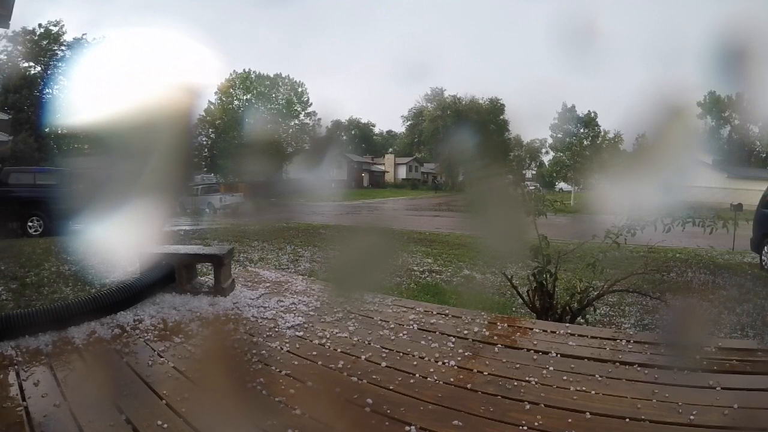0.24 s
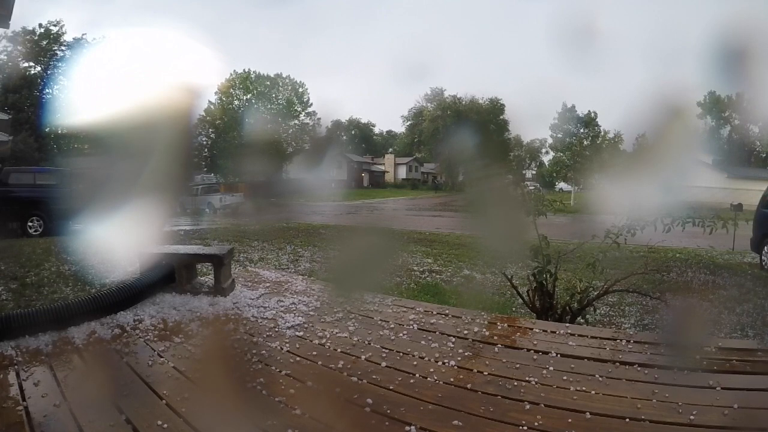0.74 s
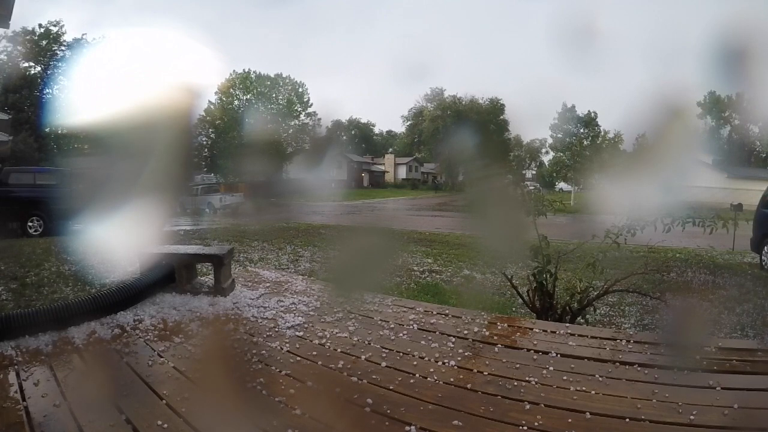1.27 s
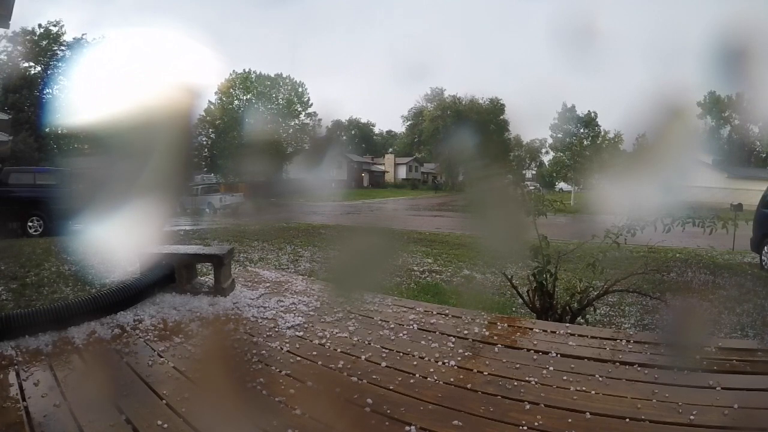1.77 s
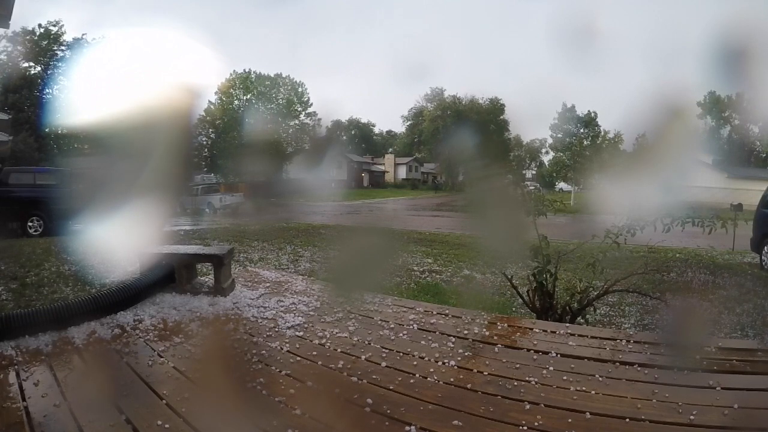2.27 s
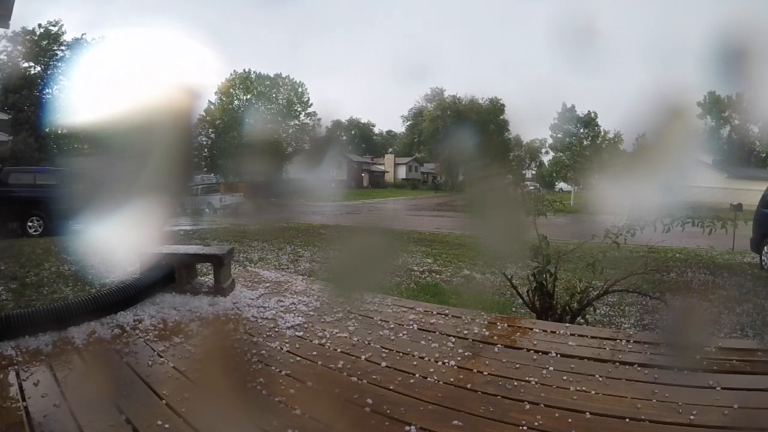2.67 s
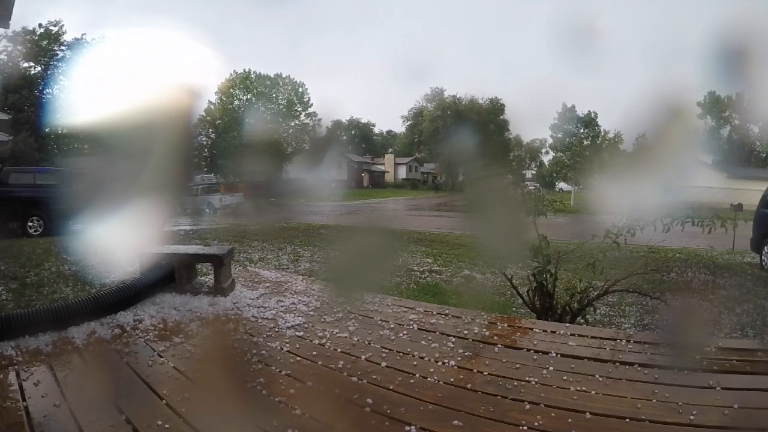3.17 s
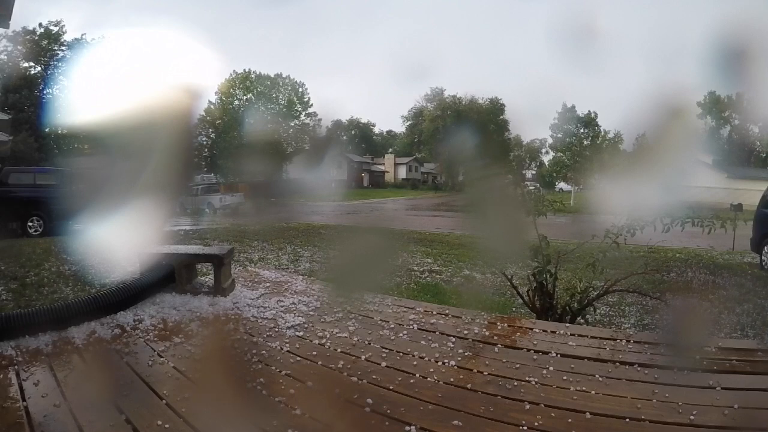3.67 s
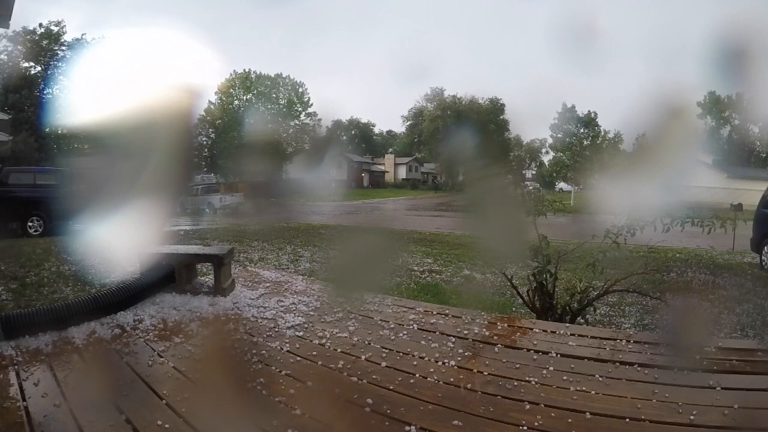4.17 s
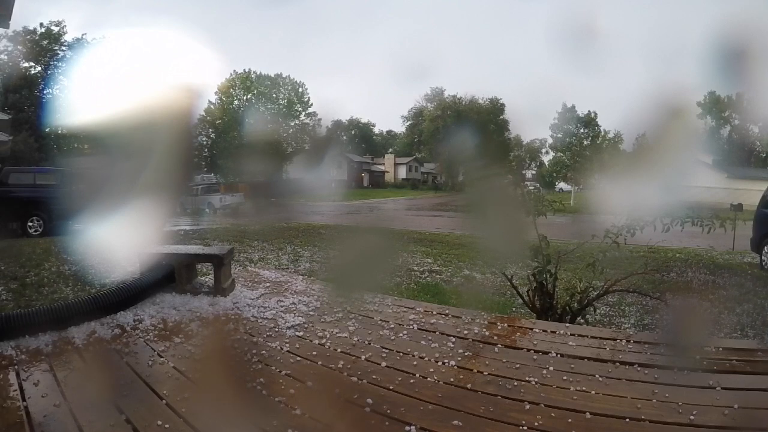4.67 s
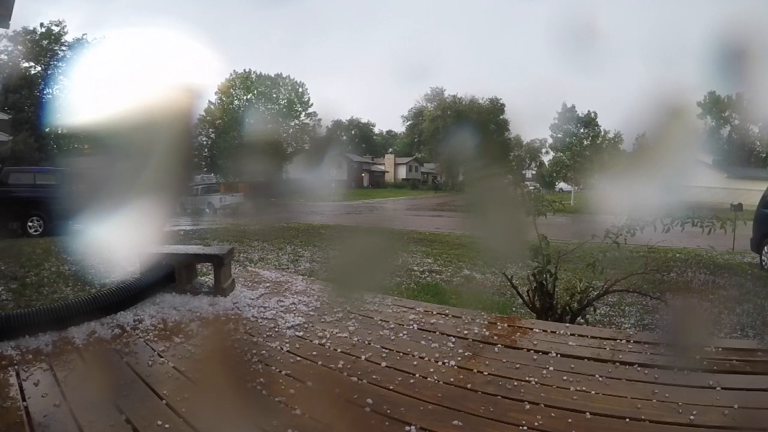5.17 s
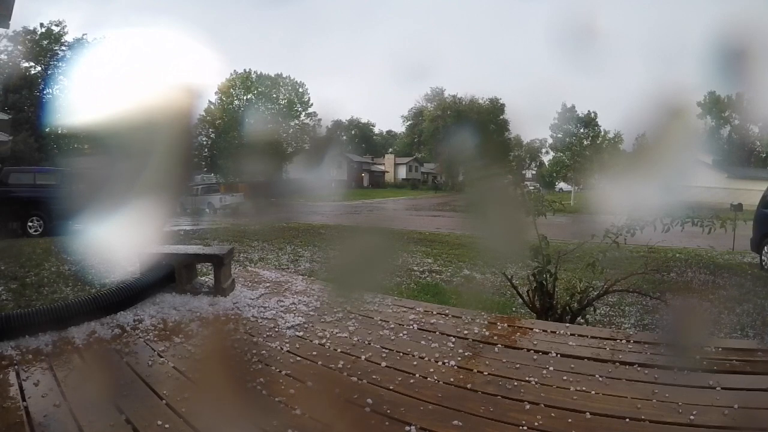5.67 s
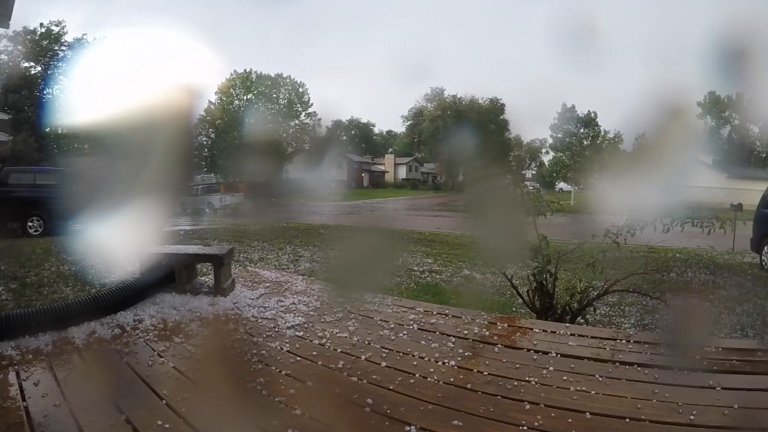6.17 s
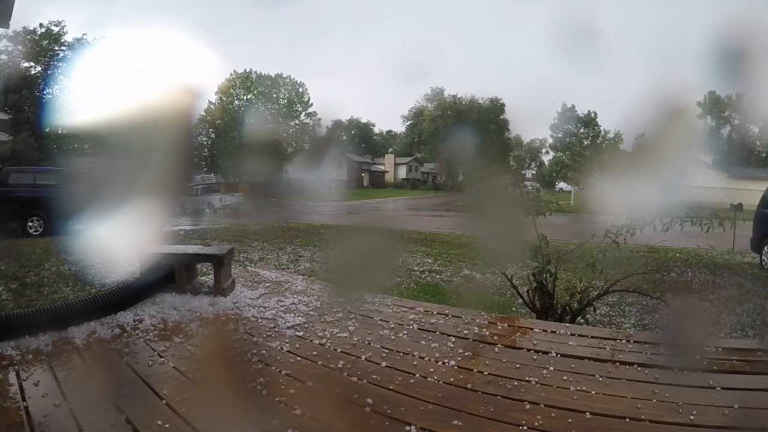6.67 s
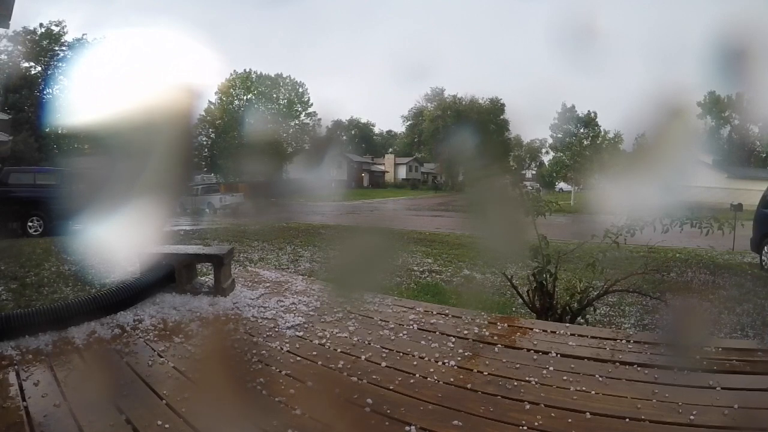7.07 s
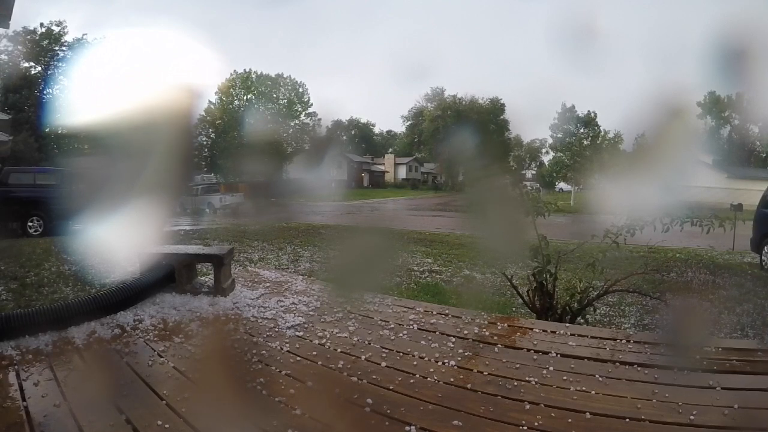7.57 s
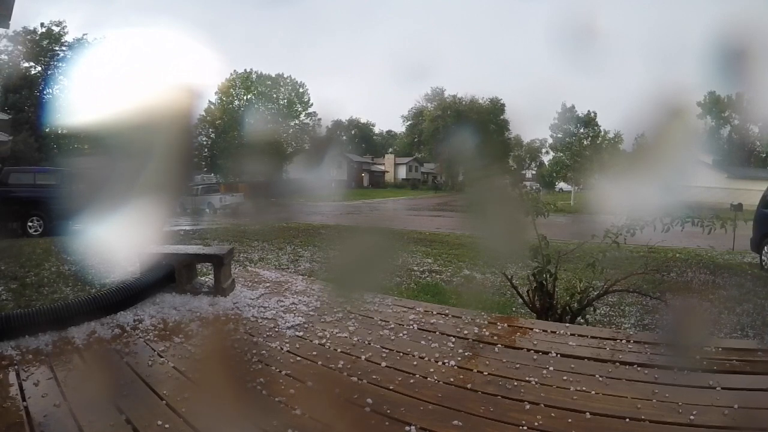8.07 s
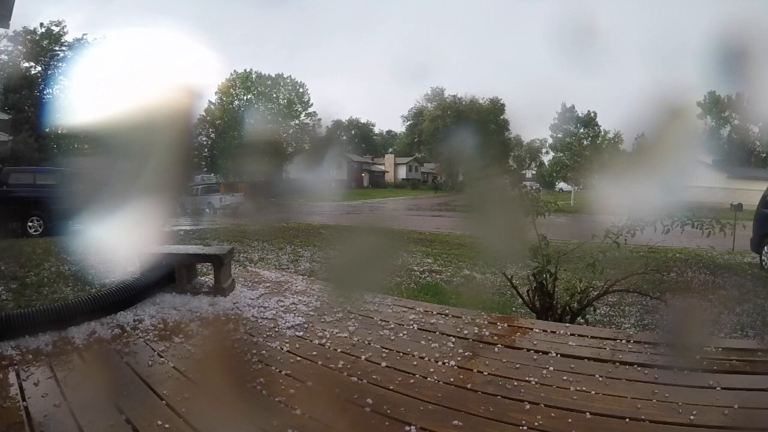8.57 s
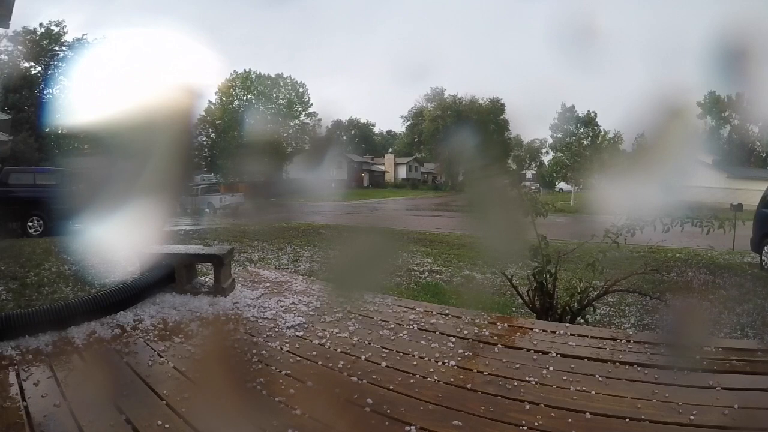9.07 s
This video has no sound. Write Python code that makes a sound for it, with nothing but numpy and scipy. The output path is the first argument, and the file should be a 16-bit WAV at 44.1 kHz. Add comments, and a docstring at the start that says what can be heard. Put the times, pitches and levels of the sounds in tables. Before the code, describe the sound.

Hail falls steadily on an outdoor wooden deck, heard from a microphone lying on the boards. Low, ringing thuds come irregularly over the drumming of smaller stones, while ice ticks and cracks on the microphone's plastic case. One very hard, hollow hit lands early and briefly ducks the sound. Rain hisses softly behind, and a faint low rumble swells now and then in the distance.

```python
"""Hail drums on a wooden deck, heard from a small camera lying on the boards in the rain.
Each stone sets the boards ringing low, and the ring comes up through the case. Right at the two
microphone ports, ice ticks on the plastic shell and the case chatters on the shaking wood.
Rain hisses beyond the deck, something rumbles far off, and the camera's gain control ducks
after the hardest blows."""
import sys
import numpy as np
from scipy import signal
from scipy.fft import rfft, irfft, next_fast_len
from scipy.io import wavfile
from scipy.ndimage import uniform_filter1d, minimum_filter1d

SR = 44100
rng = np.random.default_rng(int(sys.argv[2]) if len(sys.argv) > 2 else 0)


def wav_record(signal):
    """Record a signal, one row per channel, as 16-bit PCM in the file named by sys.argv[1]."""
    frames = np.transpose(np.atleast_2d(signal))
    bounded = np.clip(frames, -1, 1)
    # unit amplitude maps onto the largest positive 16-bit level
    quanta = np.round(bounded * 32767).astype(np.int16)
    wavfile.write(sys.argv[1], SR, quanta)


N = 411453


def gain_of(db):
    """Decibels to an amplitude factor."""
    return 10 ** (np.asarray(db) / 20)


def unit_rms(x):
    """Scales to rms 1."""
    return x / np.sqrt(np.mean(x ** 2) + 1e-20)


def curve_at(points, hz):
    """Interpolates (freq_hz, value) points on a log-frequency axis."""
    freq_hz, value = np.transpose(points)
    return np.interp(np.log(hz + 1), np.log(freq_hz + 1), value)


def blows(modes, pitch_hz, t60_scale, treble_db, samples, width_oct, uneven_db, rise_cycles, detune):
    """Two versions of each blow, for stereo: the spot struck favours the modes near pitch_hz."""
    hz, mode_db, t60_s = np.transpose(modes)[:, None, :, None]
    pitch_hz, t60_scale, treble_db = (np.reshape(x, (-1, 1, 1)) for x in (pitch_hz, t60_scale, treble_db))
    luck, phase, tune = np.moveaxis(rng.standard_normal((len(pitch_hz), 2, len(modes), 3)), 3, 0)[..., None]
    t = np.arange(samples) / SR
    spot_db = -np.minimum(6 * (np.log2(hz / pitch_hz) / width_oct) ** 2, 16)
    hardness = np.clip(np.log2(hz / 3000) / 0.7, 0, 1)  # above 3 kHz the stone's hardness takes over
    strike_db = hardness * treble_db + (1 - hardness) * spot_db
    rise = 1 - np.exp(-t * hz / rise_cycles)  # bending waves spread: low modes swell in more slowly
    decay = gain_of(mode_db + strike_db - 60 * t / (t60_s * t60_scale))
    envelope = rise * decay * gain_of(uneven_db * np.clip(luck[:, 0], -1.5, 1.5))
    angle = 2 * np.pi * hz * (1 + detune * tune[:, 0]) * t
    # the first version starts nearly in phase, as a sharp blow does; the second is scrambled
    ring = np.array([(envelope * np.sin(angle + spread_rad * phase[:, k])).sum(1)
                     for k, spread_rad in enumerate([0.78, 2.78])])
    power = uniform_filter1d(ring[:1] ** 2, size=400, axis=2)
    return ring / np.sqrt(2 * power.max(2, keepdims=True))


def crunch(sounds, spread_s):
    """Ice breaks up as it lands: each blow is smeared into a short burst of smaller ones."""
    t = np.arange(1600) / SR
    grit = 0.35 * rng.standard_normal((sounds.shape[1], len(t)))
    grit *= np.exp(-t / np.reshape(spread_s, (-1, 1)))
    grit[:, 0] = 3.16  # first contact
    burst = signal.fftconvolve(sounds, grit[None], axes=2)
    return burst / abs(burst[:1]).max(2, keepdims=True)


def place(sounds, start_s, level_db):
    """Lays each blow at its time and level."""
    out = np.zeros((2, N + sounds.shape[2]))
    for k, start in enumerate(start_s):
        at = round(start * SR)
        out[:, at:at + sounds.shape[2]] += gain_of(level_db[k]) * sounds[:, k]
    return out[:, :N]


def scatter(sounds, per_s, spread_db):
    """Plays the blows at chance moments; most are small, a few large."""
    strength = gain_of(spread_db * np.minimum(rng.exponential(1, N), 3))
    hits = strength * (rng.random(N) < per_s / SR)
    which = rng.integers(0, sounds.shape[1], N)
    return unit_rms(sum(signal.oaconvolve((hits * (which == k))[None], sounds[:, k], axes=1)[:, :N]
                        for k in range(sounds.shape[1])))


# The rumble, far from the deck: time_s, deep_band_db, upper_band_db
RUMBLE_LEVELS = [(0, -58, -55), (1.401, -52.5, -49), (1.461, -20.5, -22), (1.9, -42, -42),
                 (2.3, -38.5, -27), (2.75, -22, -30.5), (3.501, -36.5, -29.5), (4.202, -47.5, -29.5),
                 (5.1, -40, -43.5), (6.2, -45.5, -39.5), (6.802, -30, -29), (7.301, -36.5, -27),
                 (7.701, -24.5, -32.5), (8.197, -33, -27), (8.8, -44.5, -34), (9.33, -44.5, -37.5)]

def far_rumble():
    """Two low bands of noise swell and fade in the distance."""
    time_s, *levels = np.transpose(RUMBLE_LEVELS)
    hz, t, out = np.fft.rfftfreq(N, 1 / SR), np.arange(N) / SR, 0
    for level_db, (centre_hz, width_hz) in zip(levels, [(25, 8.1), (92, 18.7)]):
        bell = np.exp(-0.5 * ((hz - centre_hz) / width_hz) ** 2)
        band = irfft(rfft(rng.standard_normal((2, N))) * bell, N)
        out = out + gain_of(np.interp(t, time_s, level_db)) * unit_rms(band)
    return out


# Spectrum of the background hiss, cut off above about 13 kHz: freq_hz, relative_db
HISS_SPECTRUM = [(59, -29.5), (125, -3), (177, -1), (420, -32.5), (589, -62), (774, -32.5), (898, -40.5),
                 (1430, -25.5), (2000, -40), (2420, -50), (4860, -48), (9740, -52), (12300, -56.5),
                 (13700, -99), (15500, -105)]

def far_rain(level_db=-26.5):
    """Rain hisses beyond the deck, with drifting patches and a flicker where drops land."""
    frames, hz = N // 128 + 5, np.fft.rfftfreq(512, 1 / SR)
    real_a, imag_a, real_b, imag_b, patches = rng.standard_normal((frames, 257, 5)).T
    noise = np.array([real_a + 1j * imag_a, real_b + 1j * imag_b])
    patches = unit_rms(uniform_filter1d(uniform_filter1d(patches, size=6, axis=0), size=20, axis=1))
    flicker = unit_rms(uniform_filter1d(rng.standard_normal(frames), size=3))
    spectra = noise * gain_of(curve_at(HISS_SPECTRUM, hz)[:, None] + 1.5 * patches + 0.7 * flicker)
    hiss = signal.istft(spectra, nperseg=512, noverlap=384)[1][:, :N]
    return gain_of(level_db) * unit_rms(hiss)


# Modes of the plastic case around the microphones: freq_hz, level_db, t60_s
CASE_MODES = [(675, 6, 0.17), (789, 6.5, 0.072), (1018, -2, 0.11), (1390, 0, 0.074), (1632, -3.5, 0.061),
              (1775, -8.5, 0.066), (2410, 7.5, 0.03), (3150, -2, 0.018), (4060, 6, 0.0068),
              (5340, -1, 0.0051), (5920, 8.5, 0.0062), (8100, -5, 0.0057), (10020, -27.5, 0.0028),
              (560, 5.5, 0.14)]
# The loudest stones on the case, right at the microphones: start_s, level_db, pitch_hz, treble_db
CASE_TICKS = [(0.519, -11, 2460, -6.5), (0.677, -10, 1300, -4.5), (0.699, -9, 2430, -35.5),
              (0.828, -19, 2400, -15), (0.946, -13, 1400, -13), (1.3, -1, 2520, -3),
              (1.347, -21.5, 2270, -16), (1.418, -1.5, 1244, -47), (1.432, -10, 1320, -43),
              (1.443, -11, 2500, -38), (1.484, 9.5, 2620, -1.5), (1.648, -6.5, 1435, -16.5),
              (1.698, -13.5, 2700, -6), (2.403, -17, 1480, -15), (2.451, -9.5, 1820, -15),
              (2.506, -20, 2500, -26), (2.526, -17.5, 910, -11), (2.555, -10.5, 2370, -24),
              (2.57, 0.5, 1350, -46), (2.614, -9.5, 1440, -72), (2.843, -12.5, 2100, -5),
              (2.907, -10, 940, -8), (2.973, -18, 1420, -39), (3.085, -21.5, 2500, -35),
              (3.131, -2.5, 2000, -2.5), (3.146, -5.5, 1200, -33), (3.191, -26, 1390, -21),
              (3.214, -13.5, 1750, -29), (3.363, -15, 1400, -32), (3.492, -10, 1050, -11),
              (3.548, 1.5, 1114, -17), (3.856, -6.5, 2630, 2), (3.882, -16, 880, -7),
              (3.892, -10, 2430, -30), (4.062, -19.5, 1130, -41), (4.331, -14.5, 2240, -19),
              (4.359, -13.5, 2300, -23), (4.451, -10.5, 1180, -30), (4.387, -22.5, 2430, -12),
              (4.401, -14.5, 1180, -28), (4.639, -1, 3090, -11.5), (4.793, -14.5, 1110, -27),
              (4.82, -5.5, 1875, -16), (4.995, -24.5, 2400, -6), (5.186, -12, 1330, -13),
              (5.214, -12, 934, -26), (5.334, -23.5, 2780, -5), (5.353, -15, 2410, -36),
              (5.638, -5.5, 2650, -1.5), (5.9, -11.5, 1830, -28), (6.002, -20.5, 1880, -7),
              (6.203, -3, 1980, -10), (6.323, 0.5, 1195, -10), (6.416, -11, 1700, -15),
              (6.47, -10, 1290, -30.5), (6.489, -8.5, 1530, -49), (6.541, -14.5, 2090, -6),
              (6.731, -14, 1130, -27), (6.848, -15, 1500, -15.5), (6.869, -14, 1390, -8.5),
              (6.922, -20.5, 2370, -6), (6.968, -21, 2570, -2), (7.003, -22.5, 1040, -30),
              (7.058, -15, 990, -24), (7.187, -7.5, 905, -39.5), (7.233, -25, 2400, -12),
              (7.281, -8, 1570, -18.5), (7.311, -21, 2034, -26), (7.354, -4.5, 1425, -31.5),
              (7.539, -5.5, 2100, -22.5), (7.573, -18.5, 1040, -25), (7.668, -4, 1800, -11),
              (7.709, -17.5, 1480, -10), (7.798, -17, 1070, -37.5), (7.958, -23, 2000, 10.5),
              (8.229, -7.5, 1460, -8.5), (8.552, -10, 2010, -19), (8.587, 3, 1080, -18.5),
              (8.6, -6, 2320, -28.5), (8.617, -0.5, 1950, -13), (8.713, -20, 1170, -28),
              (8.76, -21.5, 1460, -15.5), (9.156, -36, 2420, -44), (9.173, -24.5, 1000, -4)]

def hail_on_case(boards, tap_db=-41, pellet_db=-47.5, chatter_db=-34.5):
    """Stones, drops and hard pellets tick on the shell, which chatters on the boards while they ring."""
    start_s, level_db, pitch_hz, treble_db = np.transpose(CASE_TICKS)
    ticks = blows(CASE_MODES, pitch_hz, t60_scale=0.38, treble_db=treble_db, samples=2500,
                  width_oct=1.1, uneven_db=1.5, rise_cycles=0.25, detune=0.035)
    spots_hz = np.geomspace(700, 3400, num=36)
    small = blows(CASE_MODES, spots_hz, t60_scale=0.19, treble_db=rng.uniform(-13.5, -1.5, len(spots_hz)),
                  samples=1200, width_oct=2, uneven_db=2.5, rise_cycles=0.5, detune=0.04)
    small = signal.sosfilt(signal.butter(8, 11000, fs=SR, output="sos"), small)
    taps = gain_of(tap_db) * scatter(crunch(small, spread_s=0.0032), per_s=900, spread_db=1.5)
    pellets = gain_of(pellet_db) * scatter(crunch(small, spread_s=0.00091), per_s=30, spread_db=4.5)
    knocks = uniform_filter1d(abs(boards[0]), size=90) ** 1.48 * rng.standard_normal((2, N))
    dull_ring = signal.lfilter(*signal.butter(4, 3300, fs=SR), small[:, :16].sum(1))
    chatter = gain_of(chatter_db) * unit_rms(signal.oaconvolve(knocks, dull_ring, axes=1)[:, :N])
    # slushy stones land duller and break up for longer
    splatter_s = np.minimum(0.0013 * gain_of(-0.45 * treble_db), 0.009)
    return place(crunch(ticks, splatter_s), start_s, level_db) + taps + pellets + chatter


# Stones landing square on the hollow face of the case: start_s, level_db
SQUARE_HITS = [(1.3, -11.5), (1.485, 13), (1.646, -18), (3.146, -15.5), (3.215, -7.5), (3.546, -12),
               (4.641, -12), (9.067, -30)]

def hollow_ring():
    """A square blow also sets the hollow of the case ringing, in two clean modes."""
    start_s, level_db = np.transpose(SQUARE_HITS)
    modes = np.array(CASE_MODES)[[1, 3]]
    rings = blows(modes, pitch_hz=np.full(len(start_s), 1700), t60_scale=0.85, treble_db=1, samples=5000,
                  width_oct=1.5, uneven_db=1.5, rise_cycles=0.6, detune=0.004)
    return place(rings, start_s, level_db)


# Modes of the deck boards under the camera: freq_hz, level_db, t60_s
BOARD_MODES = [(135.4, -6, 1), (160.43, 2.5, 0.44), (195, -0.5, 0.34), (212, -2, 0.27), (245, -4, 0.27),
               (272, -4, 0.38), (301.2, 2, 0.22), (334, -1.5, 0.16), (368, -7.5, 0.42), (418.4, -0.5, 0.34),
               (426, -0.5, 0.26), (496, -14.5, 0.22), (510, -4.5, 0.24), (682, -2.5, 0.27),
               (767.7, -0.5, 0.2), (1130, -5.5, 0.13), (1390, -11, 0.1)]
# The loudest stones on the boards, heard up through the case: start_s, level_db, pitch_hz
BOARD_THUDS = [(0.122, -3, 257), (0.223, -8.5, 272), (0.319, -5.5, 183), (0.4, -5, 174), (0.436, -1, 242),
               (0.552, -11, 235), (0.618, -5.5, 227), (0.678, -9, 287), (0.827, -4, 283),
               (0.936, -3.5, 212), (0.981, -10, 211), (1.041, -7.5, 240), (1.112, -5.5, 160.5),
               (1.274, -7, 227), (1.349, 1.5, 202), (1.422, 2.5, 203), (1.451, -5, 177), (1.482, -3, 149),
               (1.512, 1.5, 150.5), (1.587, -3.5, 157.6), (2.352, -5, 246), (2.528, -7.5, 195),
               (2.562, 0, 235), (2.599, 0, 200), (2.758, -8, 195), (2.829, -11, 218), (2.991, -12, 177),
               (3.111, -7.5, 231), (3.317, -3.5, 224), (3.425, -10.5, 245), (3.505, -5, 162),
               (3.542, -2.5, 189), (3.567, -2, 210), (3.611, -9, 209), (3.895, -2.5, 288),
               (3.952, -3.5, 257), (4.083, -9.5, 156), (4.196, -6, 282), (4.397, -8.5, 280),
               (4.27, -16, 239), (4.45, -8, 245), (4.515, -9, 272), (4.564, -2.5, 223), (4.647, -4.5, 195),
               (4.742, -3.5, 245), (4.813, -11, 183), (5.009, -8.5, 236), (5.186, -7.5, 212),
               (5.212, -1, 344), (5.249, -10, 259), (5.329, -4, 195), (5.486, 2, 191), (5.858, -12, 385),
               (6.021, -8.5, 184), (6.324, 2, 310), (6.362, -2, 152), (6.469, -0.5, 261),
               (6.655, -4.5, 368), (6.824, -9.5, 195), (6.725, -11, 231), (7.001, 0, 212),
               (7.053, -8.5, 194), (7.188, -5.5, 214), (7.226, -6, 202), (7.57, 3, 196.6), (7.589, 0, 295),
               (7.8, 0.5, 242), (7.828, 2, 210), (7.957, -2, 218), (8.203, -1, 218), (8.458, -10.5, 192),
               (8.588, -2, 255), (8.632, -8.5, 248), (8.876, -4, 224), (9.031, -11, 297),
               (9.056, -9.5, 180.5), (9.158, 5, 286), (9.2, -6, 169)]
# How hard the small stones come down all over the deck: time_s, level_db
SHOWER_LEVELS = [(0.0, -25.5), (0.52, -16.5), (0.68, -27), (1.301, -15.5), (1.821, -25), (2.551, -18.5),
                 (3.06, -21), (5.399, -17.5), (6.811, -26.5), (7.12, -21.5), (7.77, -18.5), (8.31, -25.5),
                 (9.33, -25.5)]

def hail_on_deck():
    """Loud stones thud on the boards over the drumming of many small ones."""
    start_s, level_db, pitch_hz = np.transpose(BOARD_THUDS)
    t60_scale = 0.65 * gain_of(3 * rng.standard_normal(len(start_s)))  # some spots ring longer
    thuds = blows(BOARD_MODES, pitch_hz, t60_scale, treble_db=0, samples=6000,
                  width_oct=0.4, uneven_db=5, rise_cycles=0.38, detune=0.027)
    spots_hz = np.geomspace(130, 450, num=14)
    small = blows(BOARD_MODES, spots_hz, t60_scale=0.78, treble_db=0, samples=6000,
                  width_oct=0.41, uneven_db=3.5, rise_cycles=0.71, detune=0.0371)
    shower_db = np.interp(np.arange(N) / SR, *np.transpose(SHOWER_LEVELS))
    drumming = gain_of(shower_db) * scatter(small, per_s=105, spread_db=4)
    wood = signal.butter(4, 5000, fs=SR)  # little of the boards' sound reaches above 5 kHz
    return signal.lfilter(*wood, place(thuds, start_s, level_db) + drumming)


# Phase between the two microphone ports: freq_hz, left_lead_rad
PORT_LEAD = [(60, .05), (150, 0.43), (400, 1.34), (600, 3.58), (1030, 2.1), (2500, 2.55), (3400, 7.22),
             (4500, 9.4), (7000, 11.53), (9000, 11.1), (14000, 19)]
# Balance between the ports: freq_hz, left_over_right_db
PORT_TILT = [(60, 1.5), (160, 3), (300, 7.5), (480, 9.5), (740, -3), (1800, -1.5), (2600, 1.5),
             (3800, -1.5), (6400, 1.5), (15000, -4)]
# How alike the ports hear the deck: freq_hz, coherence
PORT_COHERENCE = [(60, .98), (420, .97), (700, .75), (3000, .72), (9000, .45)]

def scene():
    """At deck level: the right port hears everything later than the left, tilted and partly unlike."""
    boards = hail_on_deck()
    weather = boards + hail_on_case(boards) + hollow_ring() + far_rain()
    # a steep low cut thins the bass of the hail and rain
    low_cut = signal.butter(8, 125, "high", fs=SR, output="sos")
    size = next_fast_len(N)
    shared, unlike = rfft(signal.sosfilt(low_cut, weather) + far_rumble(), size)
    hz = np.fft.rfftfreq(size, 1 / SR)
    coherence = curve_at(PORT_COHERENCE, hz)
    half_tilt = gain_of(curve_at(PORT_TILT, hz) / 2)
    lag = np.exp(-1j * curve_at(PORT_LEAD, hz))
    left = shared * half_tilt
    right = (coherence * shared + np.sqrt(1 - coherence ** 2) * unlike) * lag / half_tilt
    return irfft(np.array([left, right]), size)[:, :N]


def record(dry, recovery_db_per_s=90, slow_stage_s=0.4, edge_hz=16400):
    """The camera's gain ducks after a peak, more in the treble; soft clipping and a band limit follow."""
    low = signal.lfilter(*signal.butter(1, 900, fs=SR), dry)
    high = dry - low
    peak_db = 20 * np.log10(abs(low + 1.45 * high).max(0) + 1e-9)  # keener on sharp sounds
    held_db = -minimum_filter1d(-peak_db, size=881, origin=440)  # holds each peak 20 ms
    recovery_db = np.arange(N) * recovery_db_per_s / SR
    over_db = np.maximum(np.maximum.accumulate(held_db + recovery_db) - recovery_db, 0)
    over_db = signal.lfilter(np.ones(220) / 220, 1, over_db)  # 5 ms attack
    pole = np.exp(-1 / (slow_stage_s * SR))  # a slower stage stays down after a run of hard blows
    over_db = over_db + 0.3 * signal.lfilter([1 - pole], [1, -pole], over_db)
    ducked = low / gain_of(0.8 * over_db) + high / gain_of(0.95 * over_db)
    rounded = ducked / (1 + ducked ** 8) ** (1 / 8)
    band_limit = signal.firwin(511, edge_hz, window=("kaiser", 9), fs=SR)
    return signal.oaconvolve(rounded, band_limit[None], "same")


dry = scene()
out = record(dry)
wav_record(out)
```